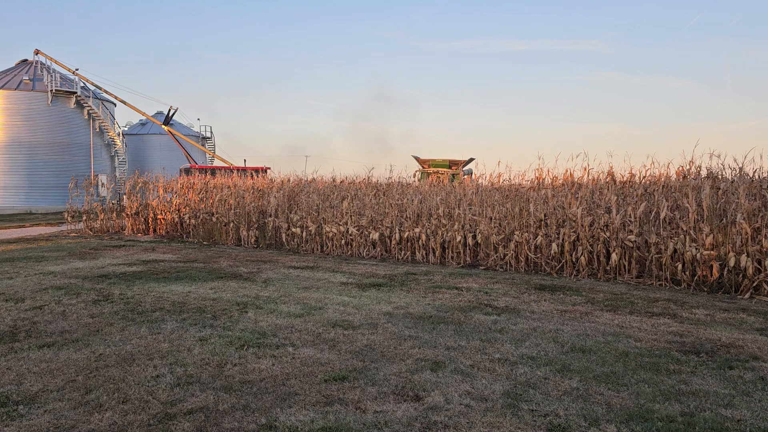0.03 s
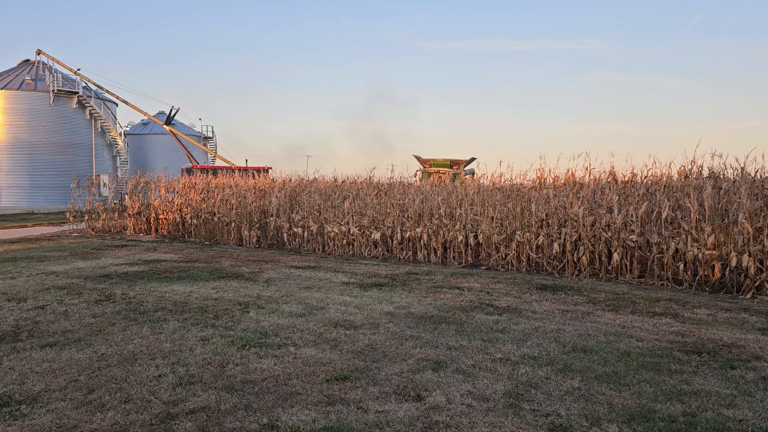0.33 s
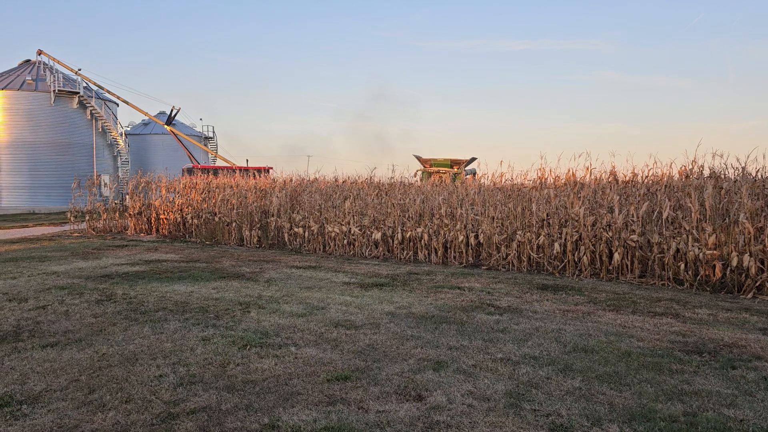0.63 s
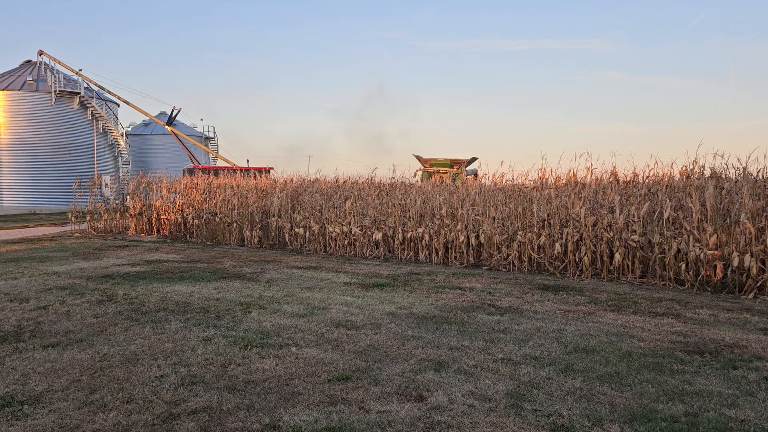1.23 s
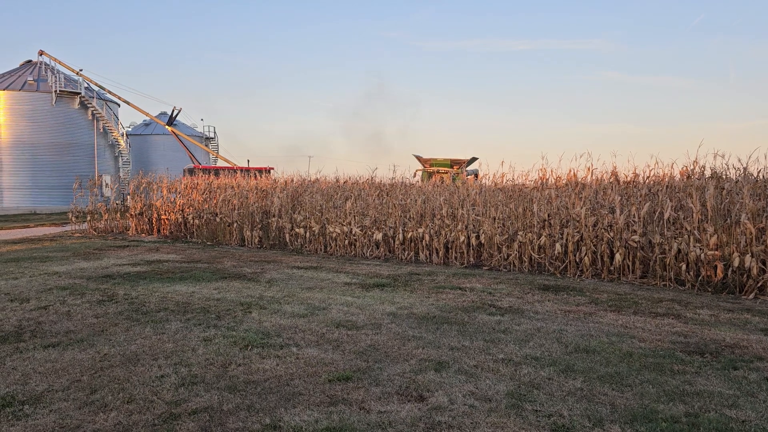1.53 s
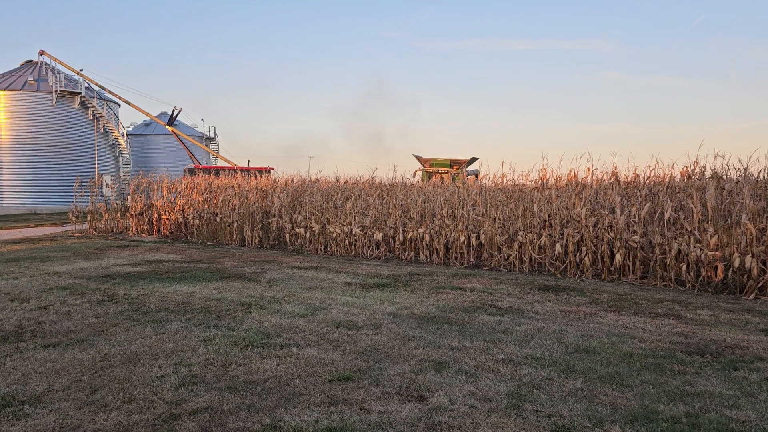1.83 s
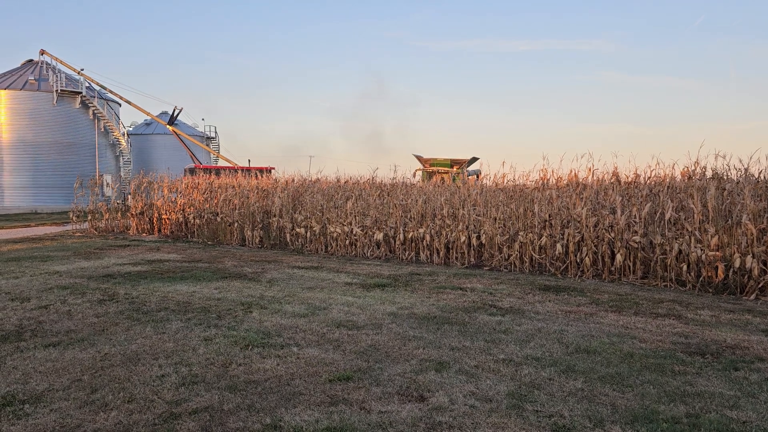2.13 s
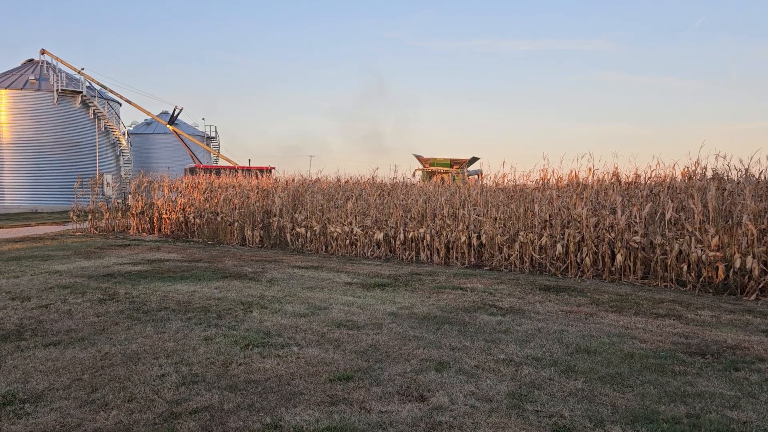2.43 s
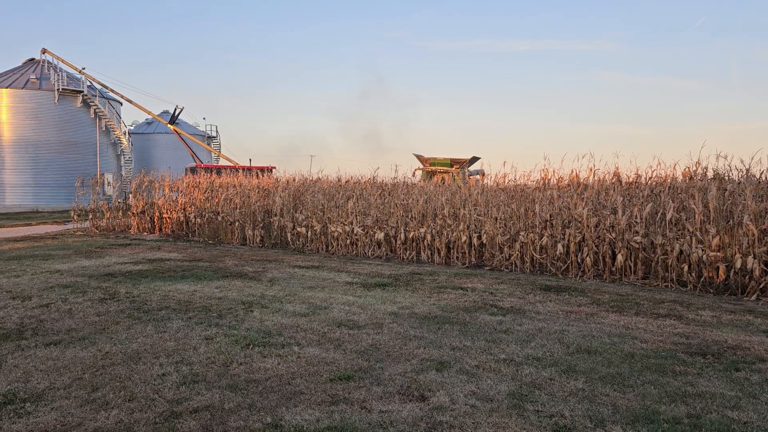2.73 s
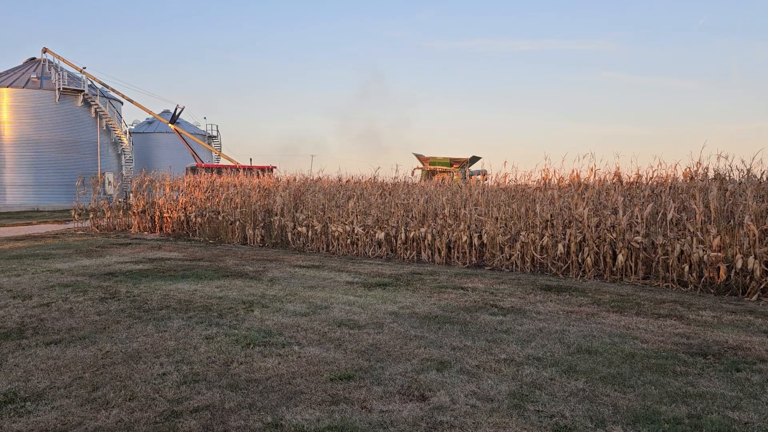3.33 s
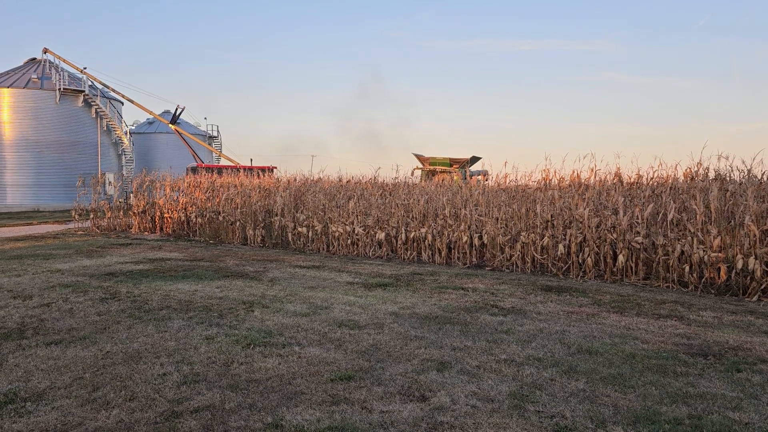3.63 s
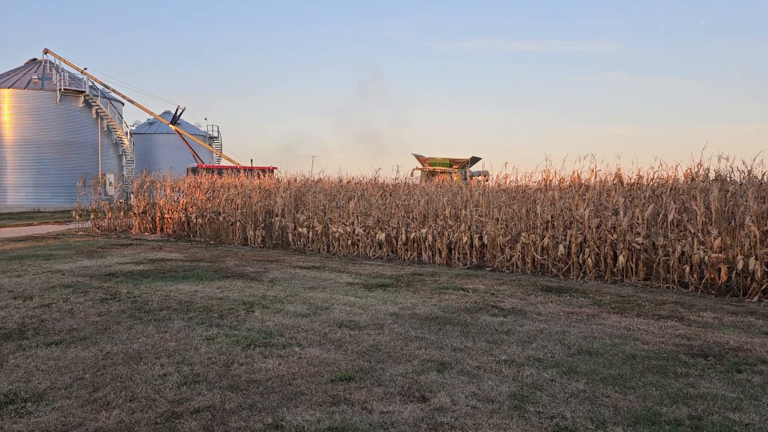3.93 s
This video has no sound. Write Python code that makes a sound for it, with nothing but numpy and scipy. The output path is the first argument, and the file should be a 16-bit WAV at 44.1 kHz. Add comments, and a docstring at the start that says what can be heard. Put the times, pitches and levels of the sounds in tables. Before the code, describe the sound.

Steady low diesel rumble of a far-off combine harvester, with a soft rush of air.

```python
"""A combine works far off behind standing maize, beside a row of grain bins, heard across an open field.
From the start its exhaust and threshing drum rumble, its diesel drones and its fans hum in thin wavering
tones, while a rush of air and dry crop swells and fades. Near 1.8 s the machinery gives one dull knock.
Near 3.5 s the deep rumble swells, then dips briefly. Two closely spaced microphone ports pick it all up."""
import sys
import numpy as np
from scipy import signal
from scipy.fft import rfft, irfft
from scipy.io import wavfile

SR = 44100
rng = np.random.default_rng(int(sys.argv[2]) if len(sys.argv) > 2 else 0)


def master_out(mix):
    """Clip the mix to full scale and print it as 16-bit PCM to the path in sys.argv[1]."""
    frames = np.transpose(np.atleast_2d(mix))
    ceiling = np.clip(frames, -1, 1)
    pcm = np.round(ceiling * 32767).astype(np.int16)
    wavfile.write(sys.argv[1], SR, pcm)


N = 176400

# how the deep rumble and the engine drone rise and fall (time [s], relative level [dB])
DEEP_SWELL = [(0.0, -12.5), (0.11, -20.5), (0.76, -20.5), (0.85, -18.5), (1.14, -17), (1.32, -17.5),
              (1.59, -17.9), (1.7, -23.5), (1.79, -16.5), (2.1, -21.5), (2.41, -19.5), (2.49, -24.5),
              (2.57, -18), (3.35, -20), (3.5, -13.5), (3.64, -30), (3.71, -17), (4.0, -22.5)]


def undb(db):
    """Turn decibels into a number to multiply a sound by."""
    return 10 ** (np.asarray(db) / 20)


def level(x, db):
    """Scale a sound to an average (rms) level in decibels."""
    return x * undb(db) / np.sqrt(np.mean(x ** 2))


def over_pitch(table):
    """Read a (frequency [Hz], value) table at every frequency of the spectrum."""
    hz, value = np.array(table, float).T
    return np.interp(np.log(np.maximum(np.fft.rfftfreq(N, 1 / SR), 1)), np.log(hz), value)


def swell(table, depth):
    """Volume curve from a (time [s], level [dB]) table; depth scales the swings around its average."""
    times, db = np.array(table, float).T
    curve = np.interp(np.arange(N) / SR, times, db)
    return undb(depth * (curve - curve.mean()))


def drift(rate):
    """A smooth random wobble of typical size 1, changing about rate times a second."""
    keep_slow = np.exp(-(np.fft.rfftfreq(N, 1 / SR) / rate) ** 2)
    keep_slow[0] = 0
    return level(irfft(rfft(rng.standard_normal(N)) * keep_slow, N), 0)


def noise_pair(spectrum):
    """Two unrelated noises, both shaped by one (frequency [Hz], level [dB]) table."""
    return irfft(rfft(rng.standard_normal((2, N))) * undb(over_pitch(spectrum)), N)


def turbulence(x, bands=14, flicker_db=0.77, flickers_per_s=15.5):
    """Moving air makes each band of frequencies flicker on its own."""
    spectrum, out = rfft(x), 0
    band_position = over_pitch(list(zip(np.geomspace(300, 14000, bands), range(bands))))
    for k in range(bands):
        band = irfft(spectrum * np.maximum(1 - abs(band_position - k), 0), N)
        out = out + band * undb(flicker_db * drift(flickers_per_s))
    return out


def tones(table, wander, fade_db, fades_per_s):
    """Tones of turning parts: speed drifts a little and each fades in and out over the distance."""
    out = 0
    for hz, db in table:
        wavering_hz = hz * (1 + wander * drift(2))
        cycles = np.cumsum(wavering_hz) / SR + rng.random()
        fading = undb(fade_db * drift(fades_per_s))
        out = out + level(np.sin(2 * np.pi * cycles) * fading, db)
    return out


def fan_whine():
    """Spinning fans and drives hum in faint, thin tones."""
    # one row per tone (frequency [Hz], level [dB])
    fan_tones = [(488.5, -47.5), (504, -51), (661.5, -50), (707, -70), (797, -50), (921, -56)]
    return tones(fan_tones, wander=0.0028, fade_db=1.5, fades_per_s=9.2)


def crop_rush():
    """Blown air and crop make a broad rush; dry stalks and chaff add a higher hiss."""
    # tone colour of the rush and of the hiss (frequency [Hz], relative level [dB])
    rush_spectrum = [(200, -16.5), (340, -15), (420, -3), (500, 1.5), (590, -2), (720, 1), (900, -4),
                     (1020, -2), (1230, -5.5), (1430, -2.5), (1620, -5.5), (1920, -4.5), (2250, -10),
                     (2550, -19.5), (4500, -66)]
    hiss_spectrum = [(1800, -22), (2450, -15), (2630, 0), (2790, -5), (2970, 5), (3200, 0), (3430, 1.5),
                     (4300, -2.5), (5100, -9), (5900, -7), (6220, -6), (6500, -9), (7000, -10.5),
                     (7280, -7.5), (8000, -11), (8600, -14.5), (9600, -14), (10300, -19), (11000, -24),
                     (13000, -19), (14000, -27), (14700, -21), (15600, -22.5)]
    # how each rises and falls (time [s], relative level [dB])
    rush_swell = [(0.0, -31.5), (0.17, -30.5), (0.38, -32.5), (0.44, -30.0), (0.67, -32.9), (0.77, -31.5),
                  (1.15, -32), (1.36, -31), (1.64, -32.5), (1.7, -30.5), (1.97, -33.5), (2.2, -30.5),
                  (2.38, -32.5), (2.98, -31.0), (3.04, -30), (3.17, -31.5), (3.48, -31.5), (3.58, -31.5),
                  (3.67, -31.5), (4.0, -32)]
    hiss_swell = [(0.0, -38), (0.11, -39), (0.18, -37), (0.26, -39), (0.41, -40.5), (0.59, -38), (0.7, -40),
                  (0.92, -38), (1.23, -39.5), (1.35, -38), (1.6, -40), (1.66, -38), (1.73, -40),
                  (1.94, -38), (2.01, -41), (2.2, -37), (2.41, -40), (2.55, -37.5), (2.69, -39),
                  (2.91, -38.5), (3.15, -37.5), (3.32, -38.5), (3.44, -38.5), (4.0, -39)]
    air = level(noise_pair(rush_spectrum) * swell(rush_swell, depth=1.07), db=-33)
    chaff = level(noise_pair(hiss_spectrum) * swell(hiss_swell, depth=1.07), db=-41.5)
    return turbulence(air + chaff)


def machinery_knock(start_s=1.838, rise_s=.008):
    """One dull, distant knock: the machinery rings at two low pitches that die away fast."""
    # the ringing (frequency [Hz], level [dB], decay time [s])
    ringing = [(160, -7, .012), (195, -9, .013)]
    age = np.maximum(np.arange(N) / SR - start_s, 0)
    ring = sum(undb(db) * np.sin(2 * np.pi * hz * age) * np.exp(-age / decay) for hz, db, decay in ringing)
    return ring * (1 - np.exp(-age / rise_s))


def engine_drone():
    """The diesel and its shafts turn steadily, making low tones that swell with the deep rumble."""
    # one row per tone (frequency [Hz], level before the swell [dB])
    engine_tones = [(35.4, -40), (84.0, -33), (100.1, -30), (158, -47.5), (207.2, -47.5), (252, -48)]
    return tones(engine_tones, wander=.001, fade_db=.8, fades_per_s=1.9) * swell(DEEP_SWELL, depth=.5)


def combine_rumble(split_hz=107):
    """The exhaust and threshing drum churn out low noise; its deep and upper parts swell separately."""
    # tone colour of the rumble (frequency [Hz], relative level [dB])
    rumble_spectrum = [(20, -38), (30, -23), (45, -12.5), (58, -4), (75, -1), (95, -0.5), (115, -0.5),
                       (140, -6), (160, -4), (215, -9.5), (245, -14), (275, -22), (340, -30), (450, -37.5),
                       (900, -94)]
    # how the upper part rises and falls (time [s], relative level [dB])
    upper_swell = [(0, -27.5), (.45, -22), (.82, -30), (1.12, -23), (1.5, -24), (1.78, -28), (1.9, -20.5),
                   (2.04, -28.5), (2.17, -25), (2.6, -26), (2.78, -20.5), (2.87, -25.5), (3.25, -23.5),
                   (3.48, -21), (3.58, -27), (3.9, -25), (4, -26)]
    churn = noise_pair(rumble_spectrum)
    hz = np.maximum(np.fft.rfftfreq(N, 1 / SR), 1)
    upper = irfft(rfft(churn) / (1 + (split_hz / hz) ** 10), N)  # keeps what lies above split_hz
    deep = churn - upper
    return level(deep * swell(DEEP_SWELL, depth=1) + upper * swell(upper_swell, depth=0.84), db=-23)


def microphone_ports(common, scattered):
    """Two nearby microphone openings share the bass; higher up they differ in level and timing."""
    # sound that differs between the ports, next to what they share (frequency [Hz], relative level [dB])
    scatter = [(25, -23), (70, -24), (130, -25), (250, -19), (500, -14.5), (900, -10.5), (1250, -6),
               (1450, -8.5), (2000, -10.5), (2600, -3), (3100, -7), (3800, -7.5), (4600, -8), (5400, -1),
               (6200, -6), (7000, -7), (8000, -8.5), (8700, -3), (9700, -6), (11000, -1.5), (15500, -3)]
    # how much louder the left is than the right (frequency [Hz], level difference [dB])
    balance = [(60, 1), (200, 0.5), (380, 2), (700, -0.5), (1250, -2), (1900, -2.5), (2300, 2.5), (2600, 5),
               (3300, -1.5), (4400, 0), (5000, 6.5), (5800, 0), (7500, -2.5), (8100, 12), (8600, 1.5),
               (9400, -2), (10300, -4), (11200, -2.5), (15000, 0)]
    # how far the left wave runs ahead of the right (frequency [Hz], phase [radians])
    left_lead = [(20, 0), (100, -.08), (200, -.11), (450, -.14), (700, -.3), (1300, 0), (1900, .15),
                 (2330, .9), (2850, -1.0), (3400, -.7), (3800, -.2), (4700, 0), (5500, -1.7), (6300, -.9),
                 (7200, -.35), (8500, .5), (9500, -.1), (10400, .4), (11500, 3.1), (12600, 4.3),
                 (15500, 3.7)]
    side = np.array([[1], [-1]])  # left, right
    scatter_gain = undb(over_pitch(scatter))
    both = (rfft(common) + side * scatter_gain * rfft(scattered)) / np.sqrt(1 + scatter_gain ** 2)
    side_gain = undb(side * over_pitch(balance) / 2)
    phase_shift = np.exp(side * 1j * over_pitch(left_lead) / 2)
    return irfft(both * side_gain * phase_shift, N)


def scene():
    """Mix the rumble and rush with the machine tones and one knock, in stereo."""
    common, scattered = combine_rumble() + crop_rush()
    common = common + engine_drone() + fan_whine() + machinery_knock()
    return microphone_ports(common, scattered)


def record(dry):
    """The recorder cuts off the highest treble."""
    cutoff_hz = 15750
    return signal.sosfilt(signal.ellip(10, .2, 80, cutoff_hz, fs=SR, output="sos"), dry)


dry = scene()
out = record(dry)
master_out(out)
```